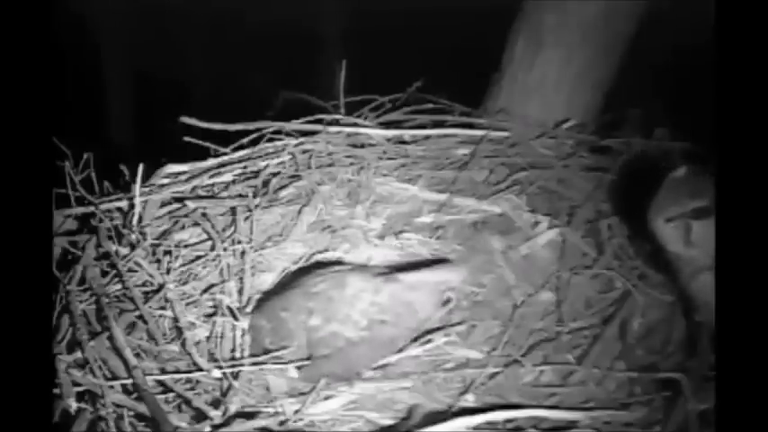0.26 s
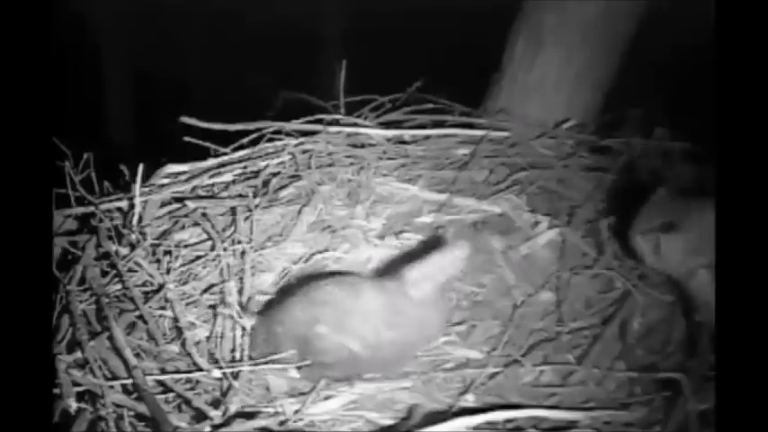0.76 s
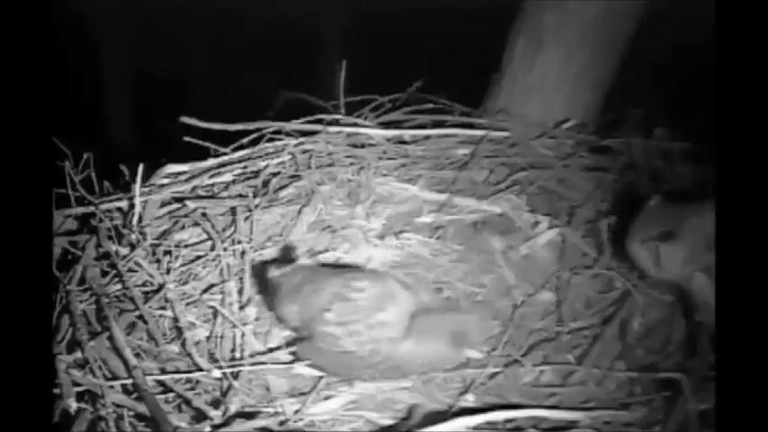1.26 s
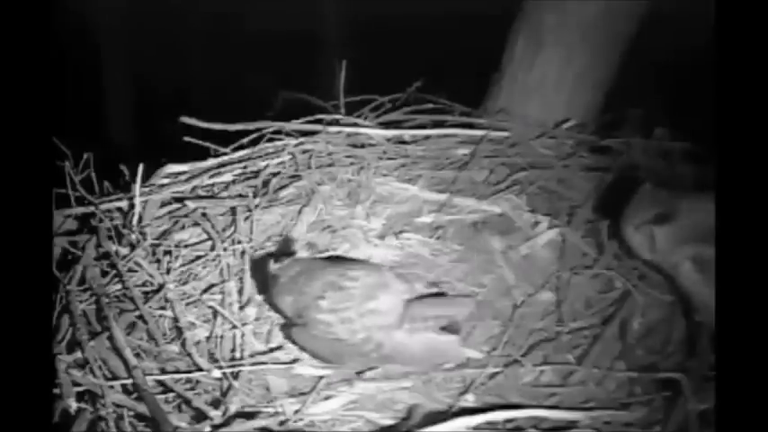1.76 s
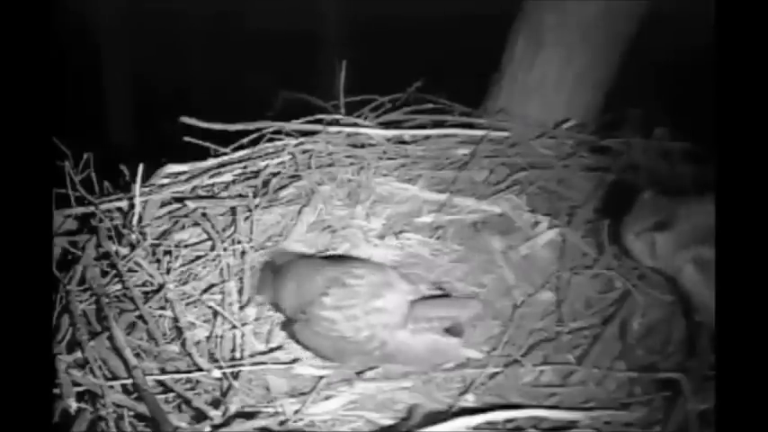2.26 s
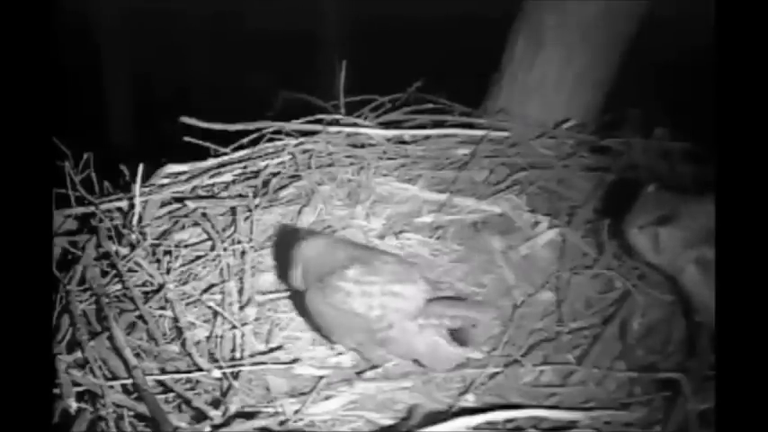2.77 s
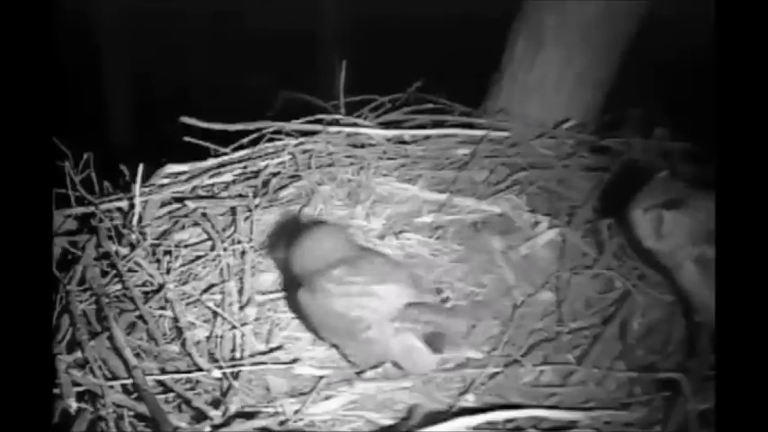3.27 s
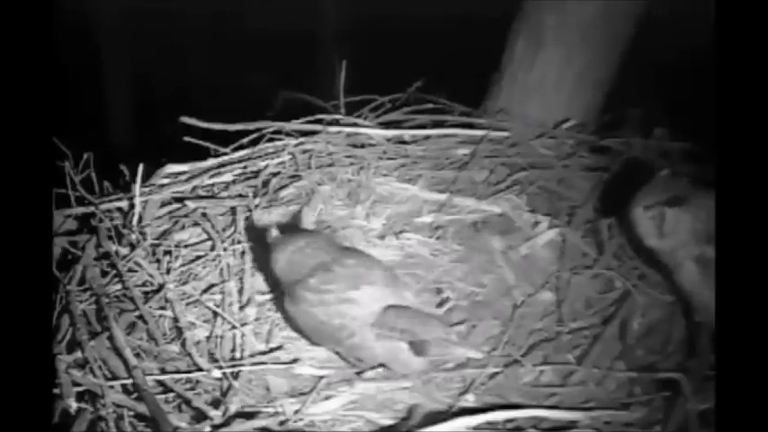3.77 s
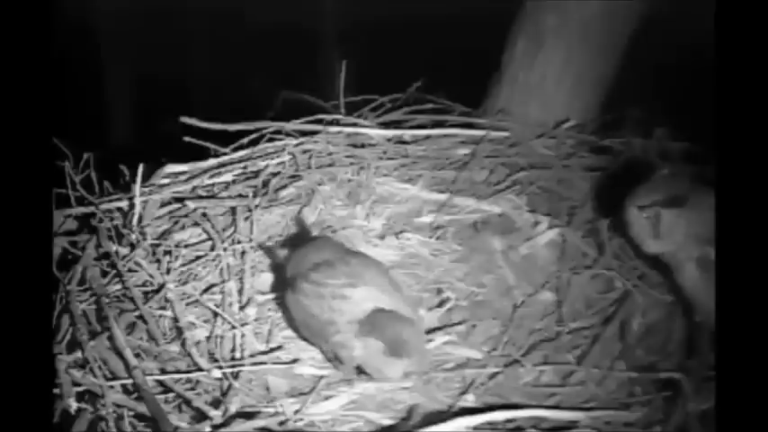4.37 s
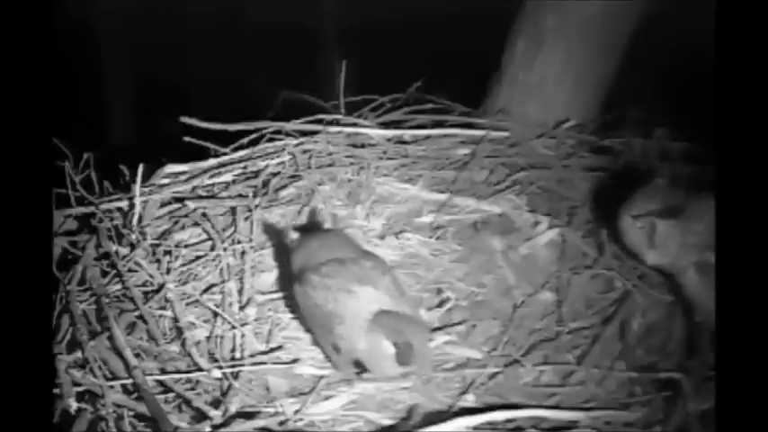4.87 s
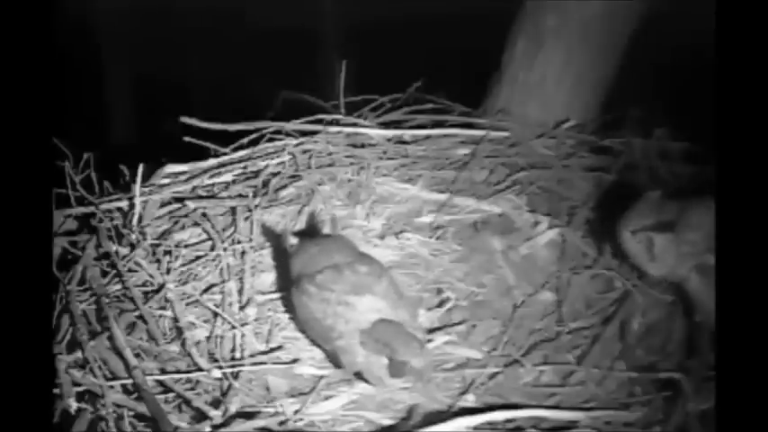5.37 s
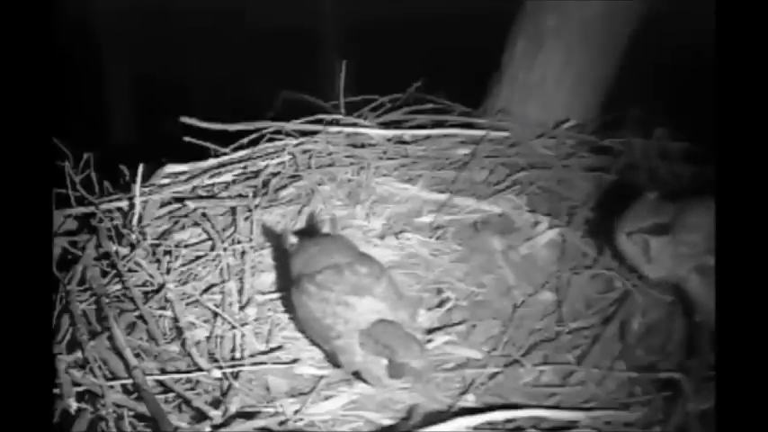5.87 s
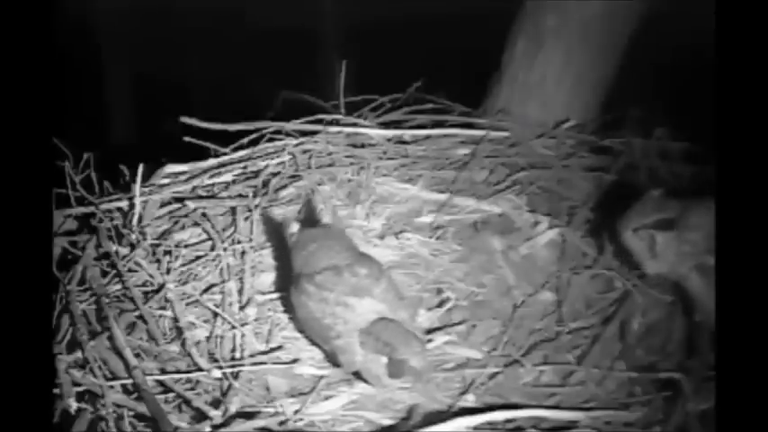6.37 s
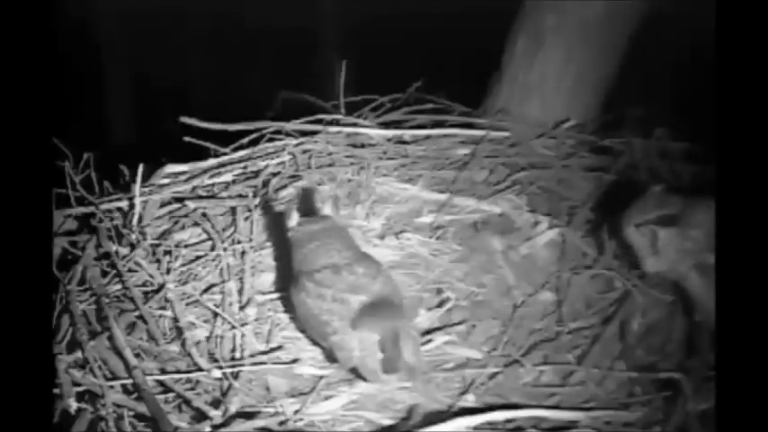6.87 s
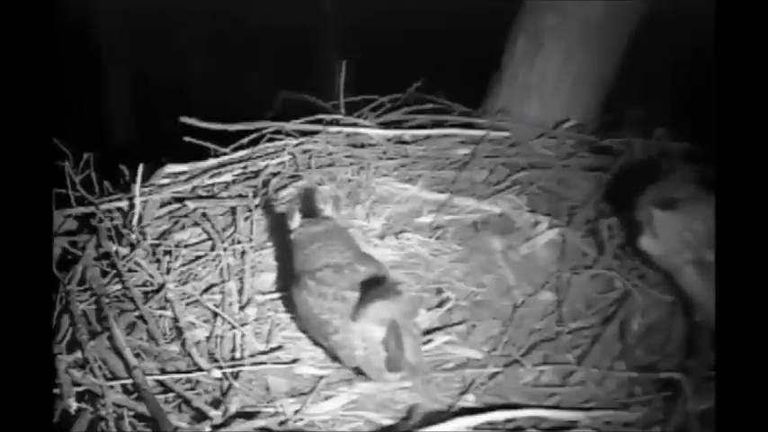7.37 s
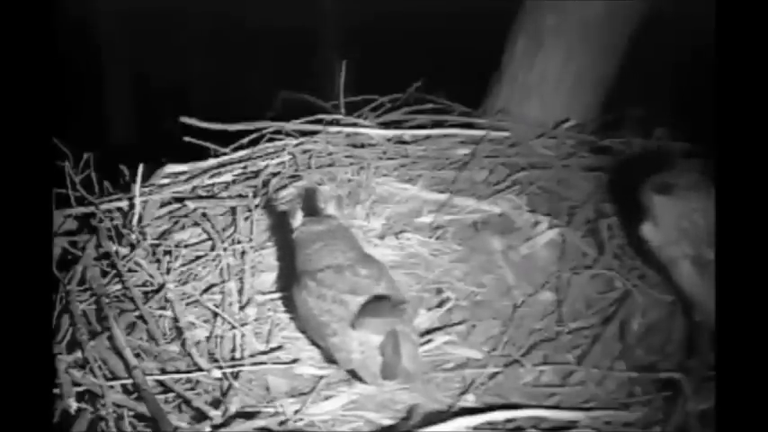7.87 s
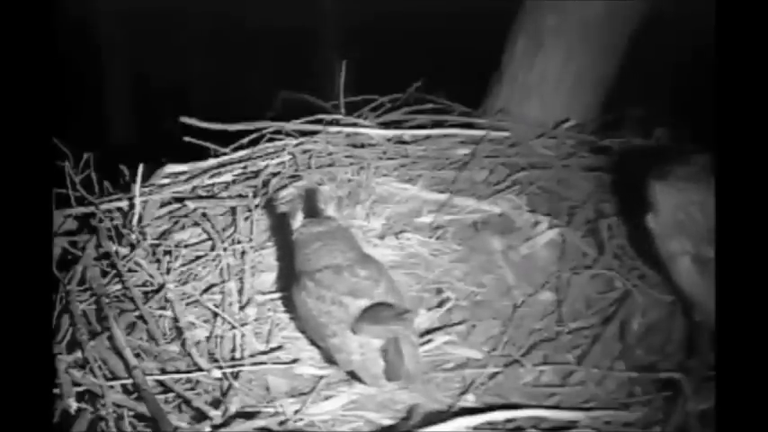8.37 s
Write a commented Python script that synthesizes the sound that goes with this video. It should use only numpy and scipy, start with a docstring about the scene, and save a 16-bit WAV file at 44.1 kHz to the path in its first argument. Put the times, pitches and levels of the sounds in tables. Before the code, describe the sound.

A low rush of night air runs throughout, with faint electrical hum, hiss and a thin high whine from the microphone. At about 0.8 seconds an owl hoots once, high and close, then three times quickly between 1.1 and 1.7 seconds. A long hoot follows at 2.2 and another at 2.9, cracking as it falls. Each hoot swoops up and slides down in pitch, overloading the microphone into a rasp while the background dips. The woods ring faintly. At 3.4 seconds a second owl answers, lower and huskier, with a quick stutter of four slurred notes, then two long, slightly raspy hoots at 4.6 and 5.4 seconds. The breeze grows under this answer, with soft, deep flutters. From about 5.8 seconds until the end at 8.5, only wind and electronic noise remain.

```python
"""A low rush of night air, mains hum, hiss and a thin whine run throughout on a nest camera's microphone.
A female horned owl hoots first, high and close: each hoot is an arch of pitch that sweeps a tone and its
octave through her throat's resonance. Near the top she overloads the microphone into a rasp, the gain
control ducks the background, and the woods ring faintly. Then the breeze freshens as the male answers,
lower and huskier, with a quick stutter and two long hoots, leaving the air and the electronics alone."""
import sys
import numpy as np
from scipy import signal
from scipy.fft import rfft, irfft, next_fast_len
from scipy.io import wavfile
from scipy.ndimage import uniform_filter1d, map_coordinates

SR = 44100
rng = np.random.default_rng(int(sys.argv[2]) if len(sys.argv) > 2 else 0)


def generate_wav(signal):
    """Clip the signal to [-1, 1] and save it as 16-bit WAV at the path in sys.argv[1]."""
    frames = np.transpose(np.atleast_2d(signal))
    scaled = np.clip(frames, -1, 1) * 32767
    pcm = np.round(scaled).astype(np.int16)
    wavfile.write(sys.argv[1], SR, pcm)


N = 380583
TIME = np.arange(N) / SR


def amp(db):
    """Decibels as a gain."""
    return 10 ** (np.asarray(db) / 20)


def unit(x):
    """x at an RMS of one."""
    return x / np.sqrt(np.mean(x ** 2) + 1e-20)


def along(points, hz):
    """Read (Hz, value) points on a log frequency axis."""
    freqs, values = np.transpose(points)
    return np.interp(np.log(hz + 1), np.log(freqs + 1), values)


def wobble(rate):
    """A smooth random curve with `rate` knots a second."""
    return map_coordinates(rng.standard_normal(int(N * rate / SR) + 4), [TIME * rate])


def filtered(x, response):
    """x through a filter given as a function of Hz."""
    size = next_fast_len(N + 8192)
    return irfft(rfft(x, size) * response(np.fft.rfftfreq(size, 1 / SR)), size)[:N]


def coloured(x, points):
    """x through an EQ curve of (Hz, dB) points."""
    return filtered(x, lambda hz: amp(along(points, hz)))


def night_air(breezy_db, flutter_db, swell_db, rush_db, buffet_db):
    """A low rush of air; as the breeze grows, deeper fluttering buffets take over."""
    # The breeze's fader, rising under the male's answer. Each row: time in seconds, level in dB.
    breeze_fader = [(0, -40), (3.3, -38.5), (3.9, -34.5), (6.4, -34), (8.5, -37)]
    # EQ of the rush and of the buffets. Each row: frequency in Hz, gain in dB.
    rush_eq = [(25, -49.5), (65, -25), (100, -40.5), (180, -11), (250, -1), (380, 0.5), (520, -3.5),
               (700, -14.5), (1000, -39), (1600, -38.5), (4000, -94)]
    buffet_eq = [(30, -37.5), (60, -28), (110, -9), (240, 6.5), (420, 1), (700, -33), (1100, -60)]
    level_db = np.interp(TIME, *np.transpose(breeze_fader))
    stir = amp(level_db - breezy_db)
    rush = unit(amp(swell_db * wobble(8.3)) * coloured(rng.standard_normal(N), rush_eq))
    lumps = amp(flutter_db * (wobble(14) + wobble(70)))
    buffets = unit(lumps * coloured(rng.standard_normal(N), buffet_eq))
    return amp(level_db) * (amp(rush_db) * rush + amp(buffet_db) * stir * buffets)


def camera_noise(mains_hz, hiss_db, buzz, whine_depth, hum_db):
    """The camera's electronics: hum, hiss that pulses at twice the mains rate, and a fluttering whine."""
    # The hum's harmonics. Each row: multiple of the mains frequency, level in dB before the hum's fader.
    harmonics = [(2, -67.5), (3, -55.5), (4, -54.5), (5, -46), (6, -44), (7, -50.5)]
    # EQ of the hiss. Each row: frequency in Hz, gain in dB.
    hiss_eq = [(60, -16), (500, 10.5), (1500, -7), (4200, -6), (6000, -2), (7200, -3), (8300, 0.5),
               (10200, -0.5), (10800, -7), (11300, -36), (12000, -62)]
    # The whine's tones. Each row: frequency in Hz, level in dB against the hiss.
    whine_tones = [(2121, -24), (4247, -37), (6315.5, -3.5)]
    mains = 2 * np.pi * mains_hz * TIME
    hum = sum(amp(db + wobble(5.8)) * np.sin(round(k) * mains + 0.17 * wobble(2.37))
              for k, db in harmonics)
    pulsing = np.exp(buzz * np.cos(2 * mains))
    hiss = unit(coloured(rng.standard_normal(N) * pulsing, hiss_eq))
    whine = sum(amp(db) * np.sin(2 * np.pi * hz * TIME) for hz, db in whine_tones)
    whine *= 1 + whine_depth * np.sin(mains)
    return amp(hum_db) * hum + amp(hiss_db) * (hiss + whine)


def female_owl():
    """The female's high, clean hoots and their rasp; her voice cracks on the last one."""
    # Her phrase. Each row: start, length, rise and fall in seconds, held pitch in Hz,
    # sag in Hz per second, overshoot in Hz, end pitch in Hz.
    hoots = [(0.786, 0.17, 0.062, 0.096, 376.8, -5, 1.5, 217),
             (1.093, 0.17, 0.069, 0.084, 394.8, -26.5, -1.5, 241.4),
             (1.284, 0.16, 0.07, 0.079, 390, 53.5, 10, 279),
             (1.41, 0.26, 0.085, 0.057, 395.5, 116.0, 1.5, 264),
             (2.175, 0.449, 0.088, 0.054, 380.9, 61.5, 24.0, 243.3),
             (2.874, 0.29, 0.093, 0.1, 375.5, 286, -0.5, 146.9)]
    # Her throat's resonance and the EQ of her rasp. Each row: frequency in Hz, gain in dB.
    throat = [(200, -38), (250, -27), (290, -19), (340, -14.5), (400, -15.5), (460, -21), (590, -25),
              (700, -34), (800, -54)]
    rasp_eq = [(450, -52), (700, -6.5), (1000, 0), (2100, -1.5), (3100, 1.5), (4000, -1), (5000, -5),
               (6800, -3.5), (10000, -2), (11300, -18), (15000, -31)]
    style = dict(rest_hz=195, rise_bend=1.89, fall_bend=1.19, dome_hz=0,
                 attack_s=0.01, fade_db=5.5, release_s=0.013)
    return owl(hoots, style, throat, rasp_eq, octave_db=-6,
               jitter=.004, flutter=.004, edge_scatter=.016, grit=.024, crackle=0.19,
               rasp_db=-19.5, knee_hz=334.5, knee_width_hz=16.7, least_drive=0.017, hoarse_drive=0.48,
               duty=0.461, duty_hz=374.3, widening=.4, spike=0.23, spike_lag_s=0.000794)


def hoot_pitch(t, style, length, rise, fall, held_hz, sag, overshoot_hz=0, end_hz=None):
    """One arch of pitch: a swoop up from rest, a sagging hold, a slide down. A bend of 1 is straight."""
    waver_hz, waver_decay_s = 6.09, .12  # an overshoot settles in a dying waver
    rest_hz = style["rest_hz"]
    holding = np.maximum(t - rise, 0)
    waver = overshoot_hz * np.exp(-holding / waver_decay_s) * np.cos(2 * np.pi * waver_hz * holding)
    dome = -style["dome_hz"] * (2 * t / length - 1) ** 2
    held = held_hz - sag * holding + waver + dome
    swoop = np.clip(1 - t / rise, 0, 1) ** style["rise_bend"]
    slide = np.clip(1 - (length - t) / fall, 0, 1) ** style["fall_bend"]
    pitch = held + (rest_hz - held) * swoop
    return pitch + ((end_hz or rest_hz) - pitch) * slide


def phrase(hoots, style):
    """Pitch and voicing (0-1) of a run of hoots; each weakens as it falls, and overlaps are slurred."""
    pitch, voicing = np.zeros(N), np.zeros(N)
    for start, length, rise, fall, *tune in hoots:
        span = (TIME >= start) & (TIME < start + length)
        t = TIME[span] - start
        gate = np.clip(np.minimum(t / style["attack_s"], (length - t) / style["release_s"]), 0, 1)
        fade = amp(-style["fade_db"] * np.clip(1 - (length - t) / fall, 0, 1) ** 2)
        pitch[span] = np.maximum(pitch[span], hoot_pitch(t, style, length, rise, fall, *tune))
        voicing[span] = np.maximum(voicing[span], gate * fade)
    return np.where(pitch > 0, pitch, style["rest_hz"]), voicing


def owl(hoots, style, throat, rasp_eq, octave_db, jitter, flutter, edge_scatter, grit, crackle,
        rasp_db, knee_hz, knee_width_hz, least_drive, hoarse_drive, **overload_shape):
    """A tone and its octave swept through the throat, and the rasp they drive out of the microphone."""
    # Moments when a voice turns hoarse. Each row: centre and half length in seconds, roughness 0-1.
    hoarse_spots = [(3.085, .022, .4), (3.6, .2, .08), (5.655, .016, .17)]
    pitch, voicing = phrase(hoots, style)
    pitch = uniform_filter1d(pitch, size=400)
    rough = sum(depth * np.exp(-((TIME - s) / half) ** 2) for s, half, depth in hoarse_spots)
    shake = (jitter + rough) * wobble(260)
    tremble = 1 - rough / 2 + (flutter + rough / 2) * wobble(190)
    phase = 2 * np.pi * np.cumsum(pitch) / SR + shake
    # just after the female's voice cracks, its octave swells
    chest_db = 7 * np.exp(-((TIME - 3.125) / 0.028) ** 2)
    octave = amp(along(throat, 2 * pitch) + octave_db + chest_db) * np.sin(2 * phase)
    fundamental = amp(along(throat, pitch)) * np.cos(phase)
    voice = voicing * tremble * np.sqrt(2) * (fundamental + octave)
    # higher is louder: the overload sets in as the pitch passes the knee, and in hoarse bursts
    drive = least_drive + 1 / (1 + np.exp((knee_hz - pitch) / knee_width_hz)) + hoarse_drive * rough
    scatter = edge_scatter * wobble(3000)
    fizz = (grit + crackle * rough) * rng.standard_normal(N) * np.exp(.5 * wobble(500))
    steps = overload(phase + scatter, pitch, **overload_shape)
    rasp = converter_grit(voicing * drive * amp(rasp_db) * (steps + fizz), rate_hz=22050)
    low_cut = [(90, -37.5), (185, -1.5)]
    return coloured(voice, low_cut), coloured(rasp, rasp_eq)


def overload(phase, pitch, duty, duty_hz, widening, spike, spike_lag_s):
    """One crest of each cycle flips into a flat step for a share of the period; a thin spike follows."""
    share = np.clip(duty * (pitch / duty_hz) ** widening, .03, .5)
    step = (np.cos(phase) > np.cos(np.pi * share)) - share
    thin_pulse = np.cos(phase - 2 * np.pi * pitch * spike_lag_s) > np.cos(np.pi * .05)
    return spike * thin_pulse - step


def converter_grit(x, rate_hz):
    """Sharp steps land on the converter's coarse sample grid and fold into a gritty treble."""
    hold = round(SR / rate_hz)
    return x[np.arange(N) // hold * hold]


def ducking(voices, knee_db, linger_db, recovery_db_per_s):
    """Gain control: the background dips under a loud hoot; a second, slow stage creeps back after it."""
    power = np.abs(uniform_filter1d(voices ** 2, size=900))
    fast_db = 10 * np.log10(1 + power / amp(knee_db) ** 2)
    recovered = recovery_db_per_s * TIME
    slow_db = np.maximum.accumulate(np.minimum(fast_db, linger_db) + recovered) - recovered
    return amp(-fast_db - slow_db)


def woods_reverb(x, tail_db):
    """A faint diffuse tail from the trees."""
    # How long the woods ring. Each row: frequency in Hz, seconds to die away by 60 dB.
    decay_times = [(200, 0.55), (500, 0.93), (2000, 0.12)]
    hz, t, noise = signal.stft(rng.standard_normal(SR), SR, nperseg=256)
    decay = amp(-60 * t / along(decay_times, hz)[:, None])
    tail = signal.istft(noise * decay, SR, nperseg=256)[1]
    return amp(tail_db) * signal.fftconvolve(x, tail / np.linalg.norm(tail))[:N]


def hollow_echo(x, delay_s, centre_hz, width_hz, echo_db):
    """A late echo that favours one narrow band, so that only the highest held notes ring on."""
    band = lambda f: 1j * f * width_hz / (centre_hz ** 2 - f ** 2 + 1j * f * width_hz)
    return amp(echo_db) * filtered(x, lambda f: band(f) ** 2 * np.exp(-2j * np.pi * f * delay_s))


def male_owl():
    """The male's lower, husky answer and its rasp: four slurred notes, then two long hoots."""
    # His phrase. Each row: start, length, rise and fall in seconds, held pitch in Hz,
    # sag in Hz per second.
    hoots = [(3.415, 0.12, 0.085, 0.1, 283.1, 28.0), (3.554, 0.089, 0.057, 0.059, 258.4, 15),
             (3.624, 0.087, 0.068, 0.039, 253.8, 0.0), (3.693, 0.088, 0.052, 0.067, 224, 19),
             (4.609, 0.366, 0.098, 0.117, 282.5, 12.5), (5.42, 0.31, 0.068, 0.088, 281.5, 0.5)]
    # His throat's resonance and the EQ of his rasp. Each row: frequency in Hz, gain in dB.
    throat = [(170, -53.5), (200, -36.5), (245, -20.5), (280, -18), (370, -10), (500, -15.5), (570, -25.5)]
    rasp_eq = [(450, -42.5), (620, 13.5), (820, 1.5), (1100, 4), (1600, 0), (2300, -0.5), (2750, 2),
               (3200, -1.5), (5200, -3), (7000, -3), (10400, -4.5), (11300, -33.5), (15000, -52)]
    style = dict(rest_hz=165.7, rise_bend=2.95, fall_bend=2.45, dome_hz=6,
                 attack_s=0.0039, fade_db=3.2, release_s=0.0038)
    return owl(hoots, style, throat, rasp_eq, octave_db=-7,
               jitter=.024, flutter=.015, edge_scatter=.027, grit=.08, crackle=0.19,
               rasp_db=-23.0, knee_hz=265.8, knee_width_hz=18.4, least_drive=.05, hoarse_drive=0.14,
               duty=.085, duty_hz=277.0, widening=-3.0, spike=0.27, spike_lag_s=.0012)


def scene():
    """Both owls over the night bed on one microphone, sent to both channels, a touch louder on the left."""
    female, female_rasp = female_owl()
    male, male_rasp = male_owl()
    voices = female + male
    echoes = woods_reverb(voices, tail_db=-27.0)
    echoes += hollow_echo(voices, delay_s=.14, centre_hz=390.6, width_hz=11, echo_db=-17.0)
    breeze = night_air(breezy_db=-34, flutter_db=2.5, swell_db=1.8, rush_db=-4.0, buffet_db=-3.0)
    electronics = camera_noise(mains_hz=60, hiss_db=-54.5, buzz=0.34, whine_depth=0.6, hum_db=0.5)
    gain = ducking(voices, knee_db=-20.5, linger_db=4.0, recovery_db_per_s=3.0)
    mono = voices + female_rasp + male_rasp + echoes + gain * (breeze + electronics)
    return mono * amp(db=[[.23], [-.23]])


def record(dry):
    """The camera keeps nothing above its band limit."""
    return np.array([filtered(channel, lambda hz: hz < 15000) for channel in dry])


dry = scene()
out = record(dry)
generate_wav(out)
```